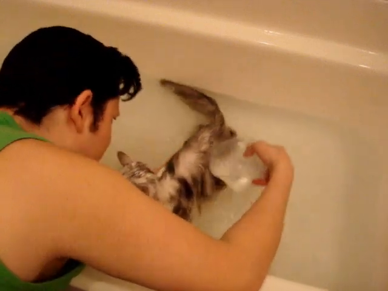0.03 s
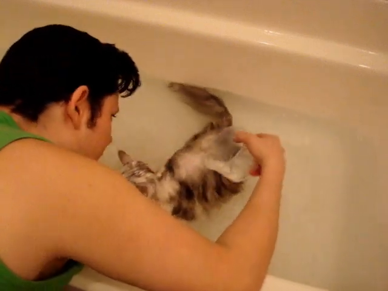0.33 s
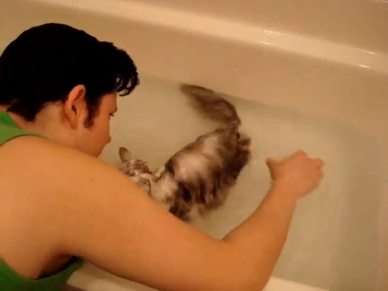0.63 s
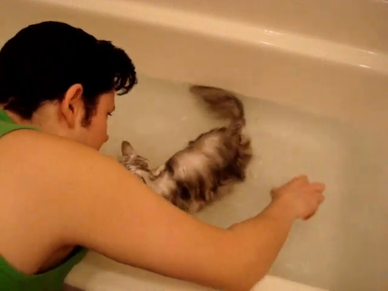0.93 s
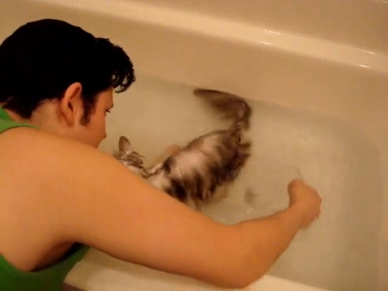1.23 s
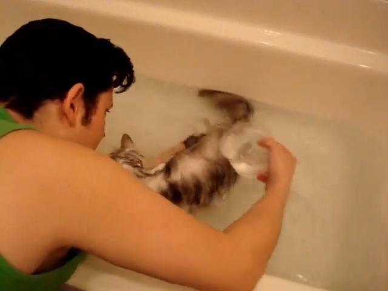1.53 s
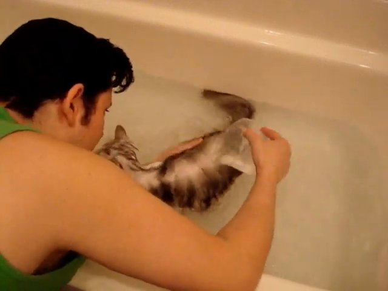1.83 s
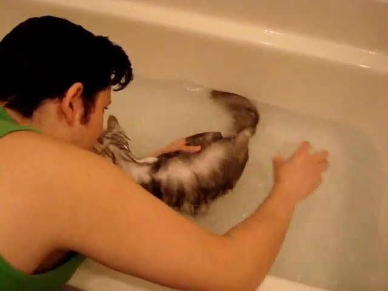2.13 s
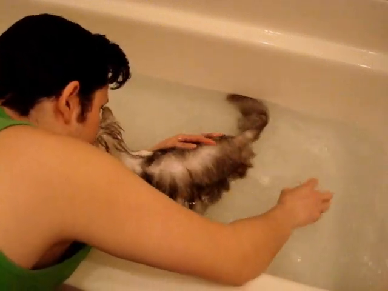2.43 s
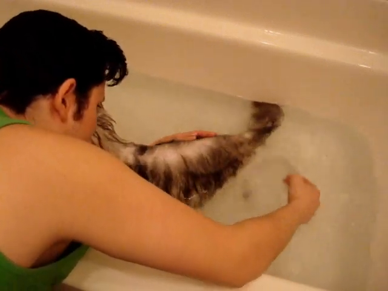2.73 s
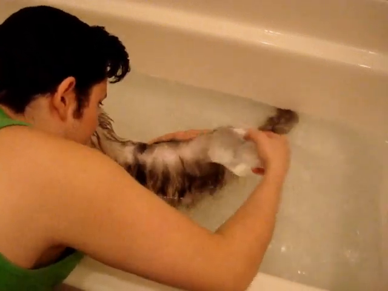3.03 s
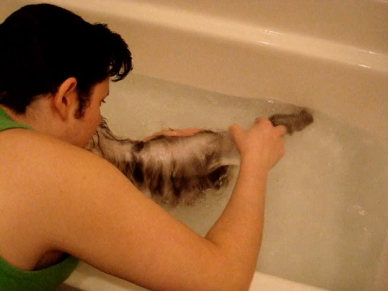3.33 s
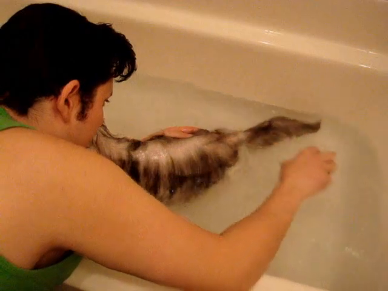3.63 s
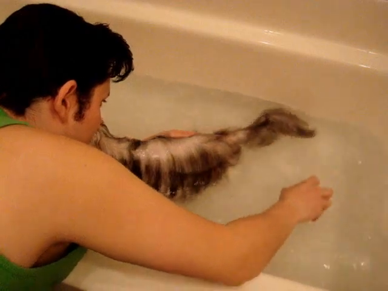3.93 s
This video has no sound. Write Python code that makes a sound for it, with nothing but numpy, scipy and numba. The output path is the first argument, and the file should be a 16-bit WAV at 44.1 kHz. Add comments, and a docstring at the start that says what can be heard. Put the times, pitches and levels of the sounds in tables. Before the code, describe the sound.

Shallow bath water splashes as a plastic cup scoops and pours it over a wet cat. A low glug opens, then repeated gurgling pours alternate with dips and drips, heard beside the tub in a small, echoing bathroom.

```python
"""A low glug and a gurgle open the scene: a plastic cup scoops shallow bath water and pours it over a
wet cat, again and again. Each pour entrains air that rings as rising bubbles, and spatters off the fur;
each dip slaps the surface and throws spray. The tub knocks under a few splashes and drones under the
last pour. Its hard walls and a small bathroom reflect the water's sound, over a faint mains hum."""
import sys
import numpy as np
from scipy import signal
from scipy.fft import rfft, irfft
from scipy.io import wavfile
from scipy.ndimage import uniform_filter1d
from numba import njit

SR = 44100
rng = np.random.default_rng(int(sys.argv[2]) if len(sys.argv) > 2 else 0)


def pcm_store(signal):
    """Save signal as 16-bit PCM."""
    levels = np.round(np.clip(np.atleast_2d(signal), -1, 1) * 32767)
    wavfile.write(sys.argv[1], SR, levels.astype(np.int16).T)


N = 176400
T = np.arange(N) / SR


def undb(db):
    """Decibels to amplitude ratio."""
    return 10 ** (np.asarray(db) / 20)


def unit(x):
    """Normalisation to an rms of 1."""
    return x / np.sqrt(np.mean(x ** 2) + 1e-18)


def steady(x, window=4000):
    """Division by the running rms evens the level and keeps the fine grain."""
    return x / np.sqrt(np.abs(uniform_filter1d(x ** 2, window)) + 1e-12)


def colour(x, spectrum):
    """Minimum-phase filtering through (frequency_hz, gain_db) points, by folding the cepstrum."""
    hz, db = np.array(spectrum).T
    grid_hz = np.maximum(np.fft.rfftfreq(2048, 1 / SR), 1)
    gain = undb(np.interp(np.log(grid_hz), np.log(hz), db))
    cepstrum = irfft(np.log(gain))
    cepstrum[1:len(cepstrum) // 2] *= 2
    cepstrum[len(cepstrum) // 2 + 1:] = 0
    return signal.oaconvolve(x, irfft(np.exp(rfft(cepstrum))))[:len(x)]


def patter(per_s):
    """A random point process: each event has a start time and two uniform chances, 0-1."""
    when, pitch, size = rng.random((12000, 3))[:int(per_s * N / SR)].T
    return when * N / SR, pitch, size


def sizes(chance, scatter_db):
    """A truncated power law turns uniform chances into many small amplitudes and a few large."""
    return undb(-scatter_db * np.log(1 - .985 * chance))


@njit
def ring(start_s, hz, decay_s, rise_octaves_per_s, size, attack_s):
    """Bubble resonance: damped oscillators whose pitch climbs linearly as they near the surface."""
    out = np.zeros(N)
    for k in range(len(start_s)):
        first, phase = max(int(start_s[k] * SR), 0), 0.
        for i in range(min(int(5 * decay_s[k] * SR), N - first)):
            t = i / SR
            pitch_hz = min(hz[k] * (1 + .693 * rise_octaves_per_s[k] * t), .45 * SR)
            phase += 2 * np.pi * pitch_hz / SR
            out[first + i] += size[k] * np.exp(-t / decay_s[k]) * t / (t + attack_s) * np.sin(phase)
    return out


def cloud(start_s, hz, size, cycles):
    """Constant-Q damping: small bubbles all decay over the same number of cycles."""
    decay_s = cycles / hz
    rise_octaves_per_s = .037 / decay_s
    return ring(start_s, hz, decay_s, rise_octaves_per_s, size, 1 / SR)


def clicks(start_s, size):
    """An impulse train: each brief impact or reflection is a single sample."""
    return np.bincount(np.abs(start_s * SR).astype(int), size, N)[:N]


def low_cut(x, cutoff_hz=340):
    """A high-pass filter keeps the bass of the splashes and ticks thin."""
    return signal.sosfilt(signal.butter(2, cutoff_hz, "high", fs=SR, output="sos"), x)


# Spectrum of the room air: frequency_hz, gain_db
AIR_SPECTRUM = [(25, -9), (60, -7), (150, 1.5), (400, 8), (1000, 4), (3000, -57), (10000, -11),
                (16000, -34)]


def background(air_db=-51.5, hum_hz=119, hum_db=-67):
    """The noise floor: broadband room air and a pure tone of mains hum."""
    air = unit(colour(rng.standard_normal(N), AIR_SPECTRUM))
    hum = unit(np.sin(2 * np.pi * hum_hz * T))
    return undb(air_db) * air + undb(hum_db) * hum


# Spectrum of the gurgling stream: frequency_hz, gain_db
GURGLE_SPECTRUM = [(40, -36), (120, -22), (300, -21), (550, -17), (800, -4.5), (1100, 2), (1700, 0),
                   (2600, 0), (4000, -10.5), (8000, -46)]
# Spectrum of drops and fine bubbles: frequency_hz, gain_db
SPRAY_SPECTRUM = [(40, -23.5), (150, -17.5), (500, -15.5), (1200, -13.5), (2500, -1), (3800, 1.5),
                  (6000, -2.5), (9300, -8), (10500, -15.5), (12500, -19), (15500, -10.5)]
# Water running from the cup and off the fur: time_s, gurgle_db, spatter_db
FLOW_LEVELS = [(0, -30.5, -30.5), (.13, -36, -40.5), (.25, -45, -43), (0.381, -50.5, -58),
               (.45, -38, -38.5), (0.569, -38.5, -33.5), (.69, -48.5, -71), (.8, -73, -38), (.9, -48, -47),
               (1.03, -56.5, -59), (1.149, -33.5, -43), (1.28, -34, -38), (1.36, -39, -39.5),
               (1.53, -25, -31.5), (1.7, -27, -28), (1.85, -26, -24.5), (1.95, -32.5, -36.5),
               (2.03, -35.5, -30.5), (2.17, -37, -36.5), (2.33, -47, -41), (2.48, -41.5, -50.5),
               (2.6, -42.5, -50.5), (2.74, -30, -35), (2.83, -42, -43), (2.925, -44, -53),
               (2.958, -25.5, -31.5), (3.09, -34.5, -35.5), (3.32, -30, -27), (3.41, -33, -30.5),
               (3.51, -32.5, -23), (3.59, -29.5, -32), (3.67, -27, -27), (3.76, -37.5, -31),
               (3.82, -69, -63), (3.9, -57, -44), (4, -38, -55)]


def pouring():
    """Air entrainment makes the stream gurgle, while fine bubbles and drops spatter off the fur."""
    time_s, gurgle_db, spatter_db = np.array(FLOW_LEVELS).T
    when, pitch, size = patter(per_s=750)
    hz = 350 + 4200 * pitch ** 1.4
    strength = sizes(size, scatter_db=3) * (pitch + .15)
    gurgle = colour(cloud(when, hz, strength, cycles=7), GURGLE_SPECTRUM)

    when, pitch, size = patter(per_s=1700)
    hz = 2000 + 14000 * pitch
    strength = sizes(size, scatter_db=4.2) * np.sqrt(hz)
    fizz = colour(cloud(when, hz, strength, cycles=10), SPRAY_SPECTRUM)

    when, sign, size = patter(per_s=1500)
    strength = np.sign(sign - .5) * sizes(size, scatter_db=7.5)
    drops = colour(clicks(when, strength), SPRAY_SPECTRUM)
    spatter = undb(-3) * steady(fizz) + undb(-5) * steady(drops)
    return (steady(gurgle) * undb(np.interp(T, time_s, gurgle_db))
            + spatter * undb(np.interp(T, time_s, spatter_db)))


def dripping():
    """Lone drips tick by impact and plink by resonance; their level follows the spatter up to a cap."""
    time_s, _, spatter_db = np.array(FLOW_LEVELS).T
    when, pitch, size = patter(per_s=85)
    hz = 4908 * 2 ** (2.4 * (pitch - .5))
    plinks = colour(cloud(when, hz, sizes(size, scatter_db=5), cycles=16), SPRAY_SPECTRUM)
    when, _, size = patter(per_s=70)
    ticks = low_cut(colour(clicks(when, sizes(size, scatter_db=7.5)), SPRAY_SPECTRUM))
    capped_db = np.minimum(np.interp(T, time_s, spatter_db), -37)
    return undb(capped_db) * (undb(-2) * unit(plinks) + undb(-8.5) * unit(ticks))


# Single large bubbles: start_s, pitch_hz, level_db, decay_s, rise_octaves_per_s
LARGE_BUBBLES = [(0, 383, -14.5, .012, 3.1), (.003, 478, -19, 0.013, 2), (.05, 1013, -5.5, 0.0057, 9.2),
                 (0.072, 1112, -7.5, 0.0045, 6.3), (.042, 2186, -13, 0.0087, 3.7),
                 (0.084, 2770, -11, .006, 14), (.184, 5570, -19, 0.0035, 3),
                 (0.241, 1030, -28, 0.011, 0.33), (0.269, 4100, -19, 0.011, 1.4),
                 (.436, 1473, -17, 0.0078, 0.8), (.463, 1126, -19, 0.01, 5), (.485, 1252, -25, .012, 3),
                 (.507, 1416, -26.5, .012, 16), (.787, 579.4, -25, 0.047, 6.8),
                 (0.809, 835, -20.5, 0.029, 35), (0.821, 1365, -21.5, 0.015, 21),
                 (.834, 1970, -16, 0.0081, 2.2), (1.148, 783, -14.5, .008, 19),
                 (1.16, 577, -19.5, 0.019, 12), (1.197, 1290, -12, 0.0075, 3.1),
                 (1.336, 4880, -20, 0.005, 1), (1.381, 4520, -25, 0.01, 0.84),
                 (1.434, 837, -20, 0.018, 8.6), (1.457, 1050, -25, 0.0043, 6.3),
                 (1.456, 2760, -11.5, 0.005, 1.3), (1.487, 880, -20, 0.0076, 3.6),
                 (1.615, 839, -14, 0.017, 4.3), (1.678, 1027, -22, 0.012, 9.6),
                 (1.7, 1360, -10.5, 0.0091, 1.1), (1.73, 1100, -15.5, 0.024, 6.1),
                 (1.805, 1090, -4, 0.0051, 4.4), (1.83, 1080, -18, 0.0083, 6.7),
                 (1.863, 3480, -2.5, 0.0027, 7), (1.874, 1278, -16.5, 0.017, 17),
                 (2.05, 2010, -24.5, 0.021, 0.81), (2.192, 3290, -18, 0.014, 2.3),
                 (2.085, 2340, -17, 0.0053, 0.67), (2.233, 712, -21.5, .016, 2.2),
                 (2.245, 1810, -17, 0.013, 3), (2.322, 1214, -17.5, 0.0079, 6.9),
                 (2.406, 1290, -22, 0.006, 3), (2.514, 1220, -20.5, 0.006, 18),
                 (2.534, 1297, -22.5, 0.0057, 15), (2.677, 1188, -16, 0.032, 26.4),
                 (2.741, 1477, -19, 0.012, 8.5), (2.419, 4450, -29, .004, 3.3),
                 (2.453, 5420, -30, 0.0045, 3), (2.814, 3670, -12.5, 0.0025, 3),
                 (2.848, 1510, -8, 0.0027, 6.2), (2.937, 863, -21, 0.013, 2.3),
                 (2.973, 1000, -22, .016, 6.3), (2.996, 1132, -18, 0.021, 19),
                 (3.026, 1120, -20, 0.0083, 3), (3.075, 2677, -16.5, 0.011, 5.1),
                 (3.242, 1900, -16.5, 0.012, 5.6), (3.345, 2260, -17.5, 0.019, 8),
                 (3.449, 958, -25, 0.037, 0.67), (3.623, 1062, -13, 0.0079, 1.8),
                 (3.712, 2055, -15, 0.0048, 1.37), (3.91, 2600, -32, 0.0092, 3)]


def bubbles(pinch_off_s=.00053):
    """Large air pockets glug and plink as mass-spring resonators: water is the mass, air the spring."""
    start_s, pitch_hz, level_db, decay_s, rise = np.array(LARGE_BUBBLES, float).T.copy()
    return ring(start_s, pitch_hz, decay_s, rise, undb(level_db), pinch_off_s)


# Slaps on the water: start_s, length_s, bubble_db, pitch_hz, spread_octaves, spray_db
SURFACE_SLAPS = [(0.043, 0.048, -26.5, 2350, 0.22, -33), (0.051, 0.036, -32.5, 4760, 0.07, -50),
                 (0.198, 0.033, -38, 4900, 0.18, -45), (0.271, 0.0049, -22.5, 4260, 0.49, -26.5),
                 (0.414, 0.011, -29.5, 7370, 0.084, -35), (0.418, 0.031, -27.5, 2980, 0.43, -36),
                 (0.525, 0.032, -25.5, 2650, 0.41, -31), (0.718, 0.029, -17.5, 3315, 0.31, -21.5),
                 (.722, 0.032, -27.5, 1180, 0.36, -41), (1.081, 0.021, -32.5, 3120, 0.27, -39.5),
                 (1.129, .03, -34, 2460, 1, -33.5), (1.185, 0.029, -23.5, 1390, 0.51, -22.5),
                 (1.288, 0.026, -36, 3280, .35, -42), (1.449, 0.019, -17, 1725, 0.48, -33),
                 (1.514, 0.023, -37, 2390, .5, -32), (1.61, 0.029, -26.5, 817, 0.28, -30),
                 (1.745, 0.0095, -21, 3260, 0.31, -24), (1.771, .02, -27, 1280, 0.26, -28),
                 (1.862, 0.033, -22, 2700, .45, -30), (1.982, 0.017, -24, 2950, 0.39, -31),
                 (2.196, 0.0086, -26.5, 3300, 0.1, -27), (2.225, 0.047, -20, 1960, .3, -26.5),
                 (2.271, 0.058, -38, 2530, 0.69, -28), (2.513, 0.044, -32, 1500, 0.23, -44),
                 (2.535, 0.0075, -34, 3920, 0.15, -42), (2.567, .05, -39, 539, 0.34, -73),
                 (2.609, 0.021, -41, 3000, 0.39, -31.5), (2.625, 0.052, -32.5, 802, 0.2, -36.5),
                 (2.68, .028, -22.5, 1757, 0.4, -19), (2.915, 0.0092, -31.5, 2740, 0.38, -36),
                 (2.949, 0.037, -30, 2640, 0.49, -35.5), (3.129, 0.0095, -17.5, 3530, 0.34, -25.5),
                 (3.18, 0.012, -22, 4260, 0.29, -25), (3.263, .032, -18.5, 2700, 0.37, -24.5),
                 (3.477, 0.039, -18.5, 2100, 0.45, -29), (3.644, 0.031, -24.5, 4110, 0.21, -23.5),
                 (3.756, .012, -23.5, 3070, 0.13, -34), (3.91, 0.019, -36.5, 3020, 0.27, -45),
                 (3.952, 0.031, -32, 2320, 0.31, -39.5)]


def splashes(count=72):
    """Each surface impact throws drops and entrains bubbles around one size; it swells fast and fades."""
    churn, spray = np.zeros(N), np.zeros(N)
    slots = np.arange(count)
    swell = np.interp(slots / count, [0, .2, 1], [.5, 1, .55])
    for start_s, length_s, bubble_db, pitch_hz, spread_octaves, spray_db in SURFACE_SLAPS:
        bubble_jitter, bubble_size, drop_jitter, drop_size = rng.random((count, 4)).T
        pitch, sign = rng.standard_normal((count, 2)).T
        bubble_s = start_s + length_s * (slots + bubble_jitter) / count
        drop_s = start_s + length_s * (slots + drop_jitter) / count
        hz = pitch_hz * 2 ** (spread_octaves * pitch)
        push = swell * np.sign(sign)
        air = cloud(bubble_s, hz, push * sizes(bubble_size, scatter_db=5), cycles=6.4)
        drops = clicks(drop_s, push * sizes(drop_size, scatter_db=3.5))
        share = np.sqrt(length_s * SR / N)  # refers the rms to the splash's own length
        churn += unit(air) * share * undb(bubble_db)
        spray += unit(drops) * share * undb(spray_db)
    filter_gain = np.linalg.norm(colour(signal.unit_impulse(N), SPRAY_SPECTRUM))
    return low_cut(churn) + colour(spray, SPRAY_SPECTRUM) / filter_gain


# The water's weight knocking the tub: start_s, level_db
TUB_KNOCKS = [(2.228, -36), (2.688, -45), (3.649, -39)]


def tub_knocks(cutoff_hz=300, decay_s=.0051):
    """Impact excitation: falling water gives the tub a dull, heavily damped knock."""
    lowpass = signal.butter(2, cutoff_hz, fs=SR, output="sos")
    body = unit(signal.sosfilt(lowpass, rng.standard_normal(N)))
    envelope = sum(undb(level_db) * (T >= start_s) * np.exp(-np.abs(T - start_s) / decay_s)
                   for start_s, level_db in TUB_KNOCKS)
    return body * envelope


# Vibration of the tub's shell under the last pour: time_s, level_db
SHELL_LEVELS = [(3.2, -61), (3.3, -59), (3.7, -49.5), (3.8, -76)]


def tub_drone(mode_hz=251.3):
    """Forced resonance: the stream drums on the tub floor and keeps one shell mode ringing unevenly."""
    time_s, level_db = np.array(SHELL_LEVELS).T
    mode = signal.lfilter(*signal.iirpeak(mode_hz, Q=35, fs=SR), rng.standard_normal(N))
    return steady(mode) * np.interp(T, time_s, undb(level_db), left=0, right=0)


TUB_DB, ROOM_DB = -5, -3.5  # reflections relative to the direct sound


def echoes(count=6, early_s=.009, build_up_s=.011, low_t60_s=.38, treble_t60_s=.33):
    """An impulse response: early reflections off the tub, then a diffuse tail, shorter in the treble."""
    t = T[:SR // 2]
    noise = rng.standard_normal(len(t))
    low = signal.sosfiltfilt(signal.butter(1, 4000, fs=SR, output="sos"), noise)
    tail = low * undb(-60 * t / low_t60_s) + (noise - low) * undb(-60 * t / treble_t60_s)
    tail *= np.clip(t / build_up_s - .5, 0, 1)
    delay_s = early_s * rng.uniform(.1, 1, count)
    walls = clicks(delay_s, rng.choice([-1., 1.], count))[:len(t)]
    return undb(ROOM_DB) * tail / np.linalg.norm(tail) + undb(TUB_DB) * walls / np.sqrt(count)


def bathroom(x, spots=6, circuits_per_s=7):
    """Reverberation depends on position: the point of impact circles spots with their own echoes."""
    out = x.copy()
    for spot in range(spots):
        distance = np.abs((T * circuits_per_s * spots - spot) % spots - spots / 2)
        crossfade = np.cos(np.pi / 2 * np.minimum(distance, 1))
        out += signal.fftconvolve(x * crossfade, echoes())[:N]
    return out / np.sqrt(1 + undb(ROOM_DB) ** 2 + undb(TUB_DB) ** 2)


def scene():
    """Superposition beside the tub: background, shell drone and the reverberant water."""
    air_and_drone = background() + tub_drone()
    water = pouring() + dripping() + tub_knocks() + splashes() + bubbles()
    return (air_and_drone + bathroom(water))[None]


def record(dry, cutoff_hz=15800):
    """Band limiting: a steep low-pass removes the highest treble."""
    return signal.sosfilt(signal.ellip(10, .2, 70, cutoff_hz, fs=SR, output="sos"), dry)


dry = scene()
out = record(dry)
pcm_store(out)
```